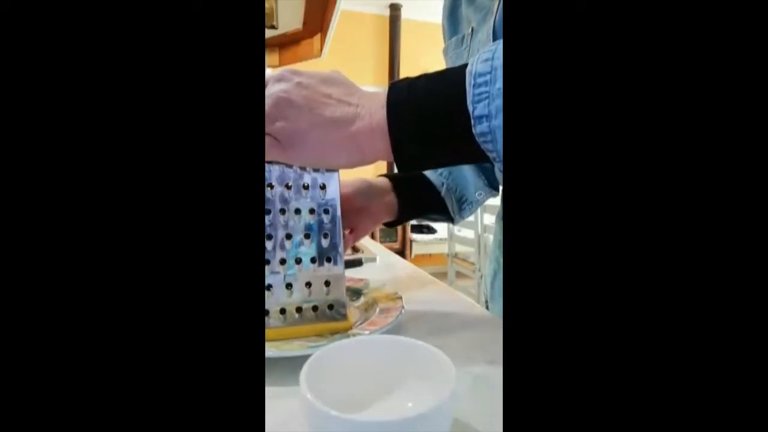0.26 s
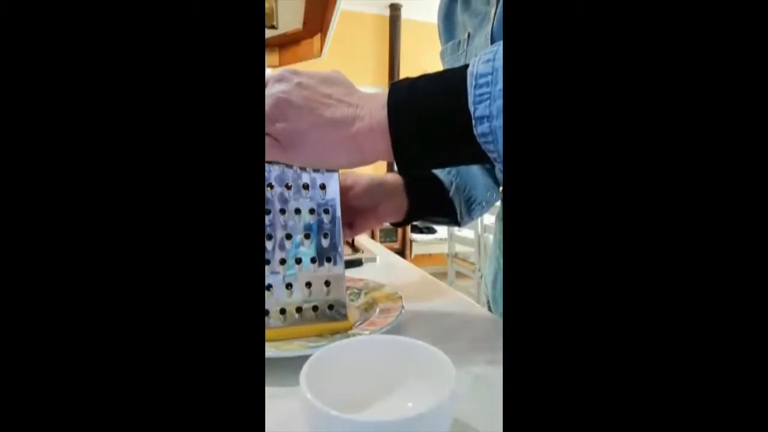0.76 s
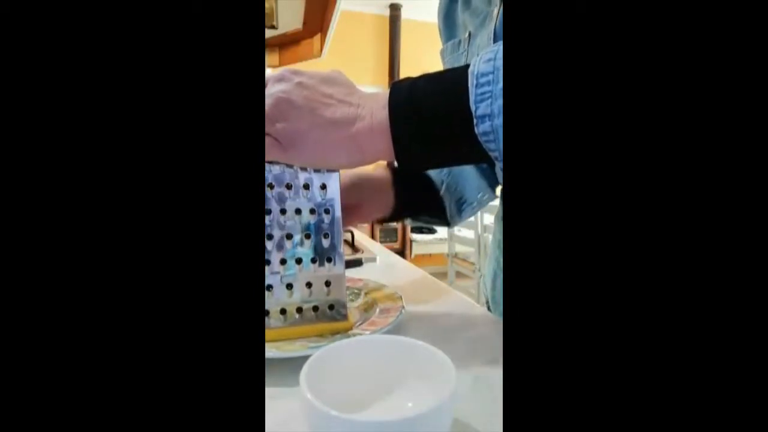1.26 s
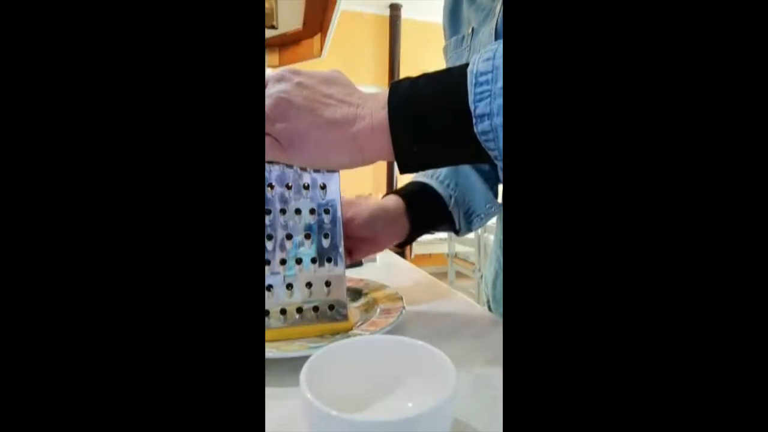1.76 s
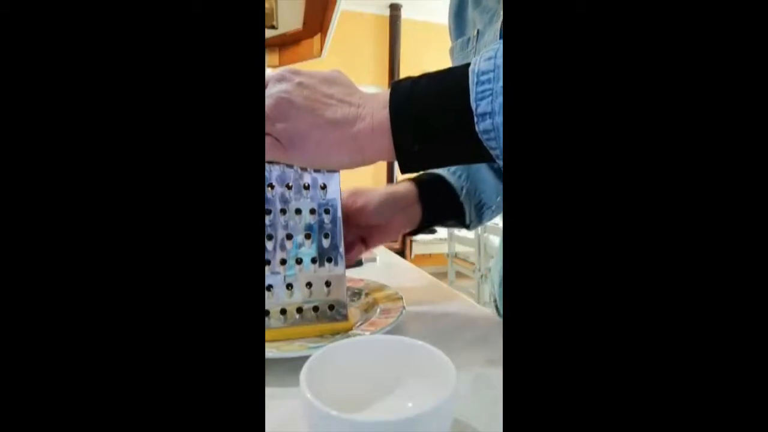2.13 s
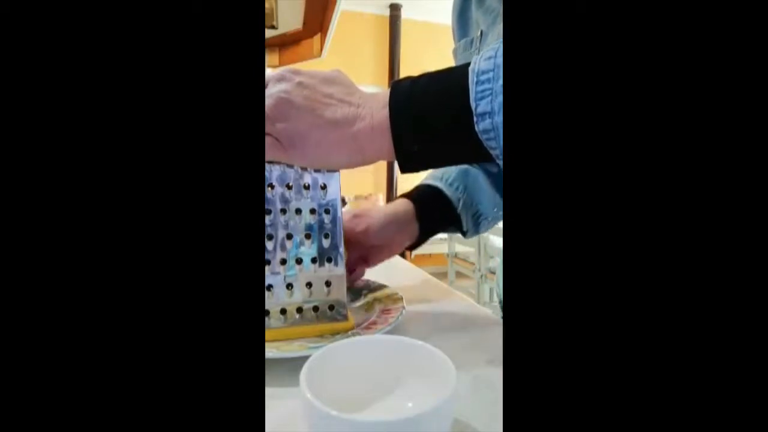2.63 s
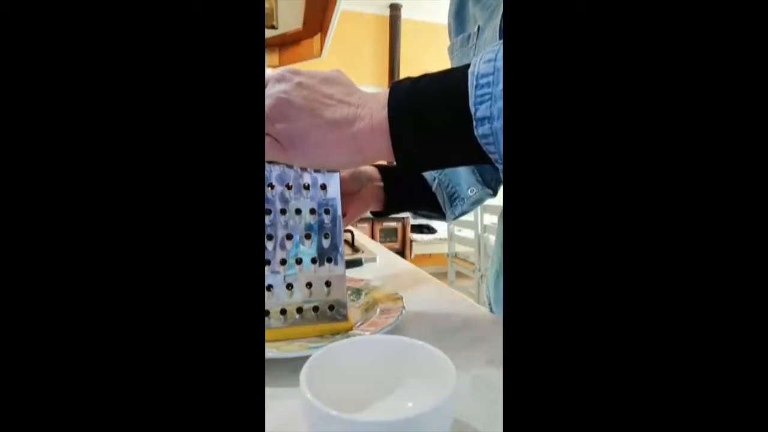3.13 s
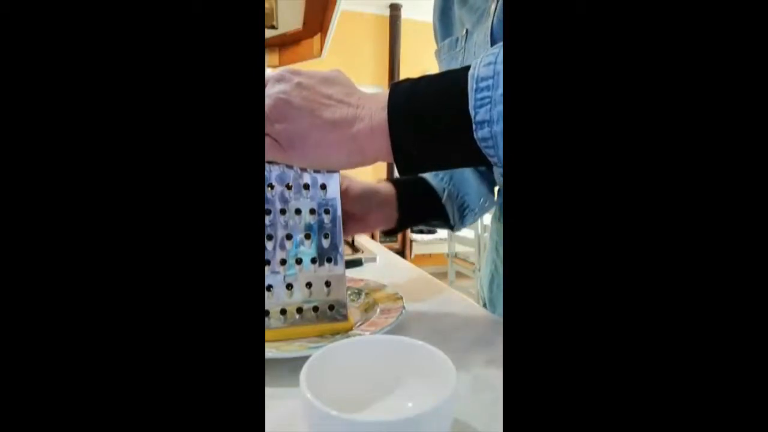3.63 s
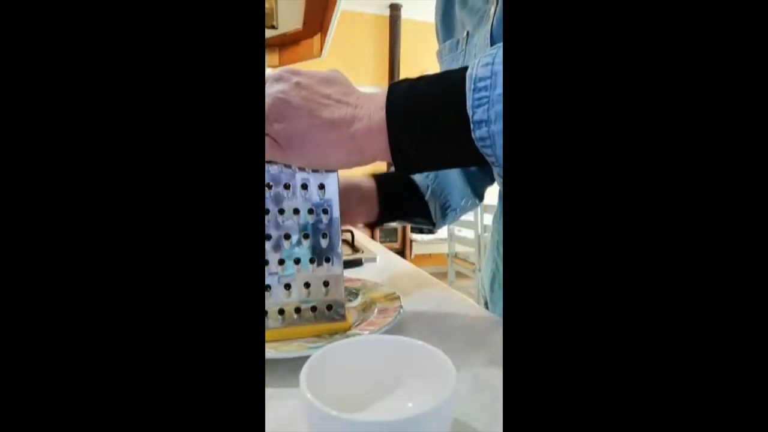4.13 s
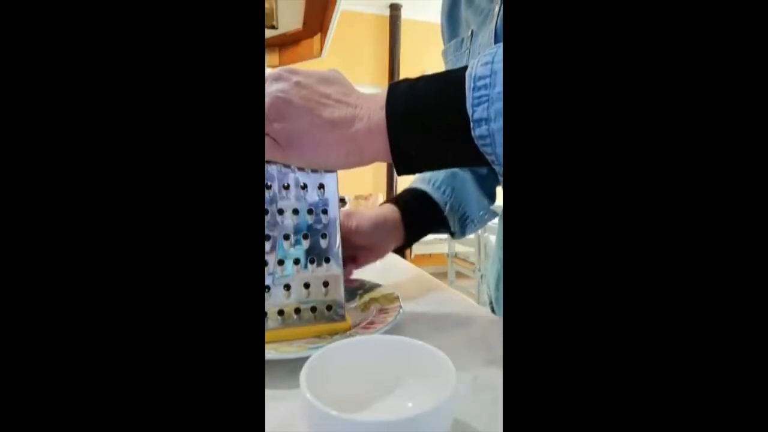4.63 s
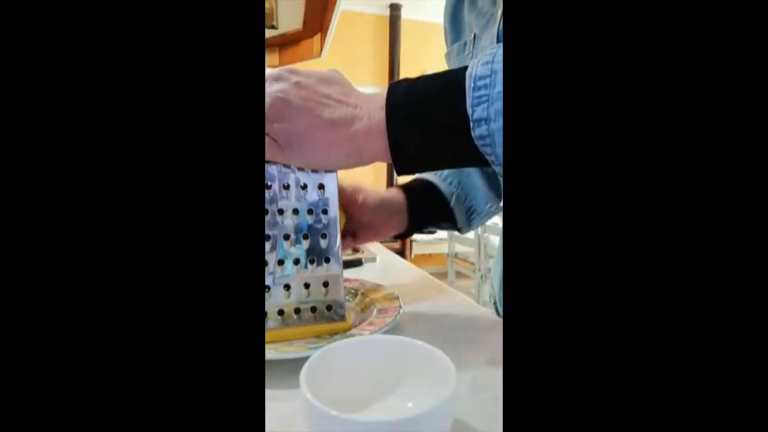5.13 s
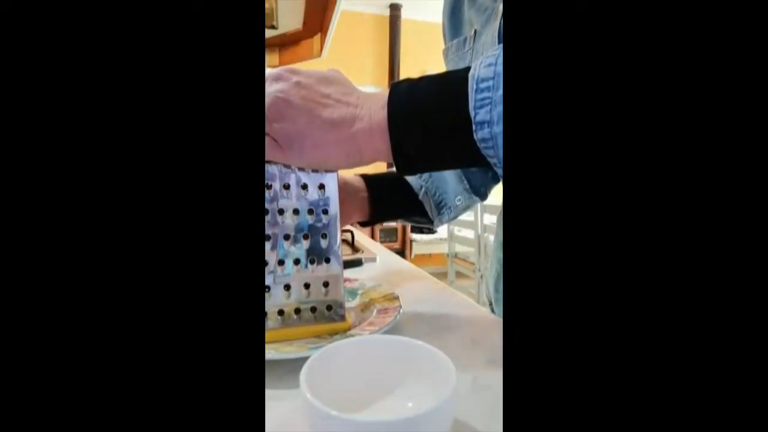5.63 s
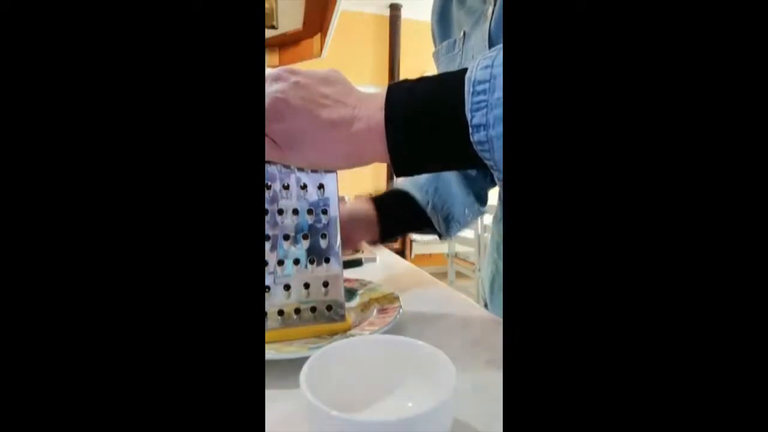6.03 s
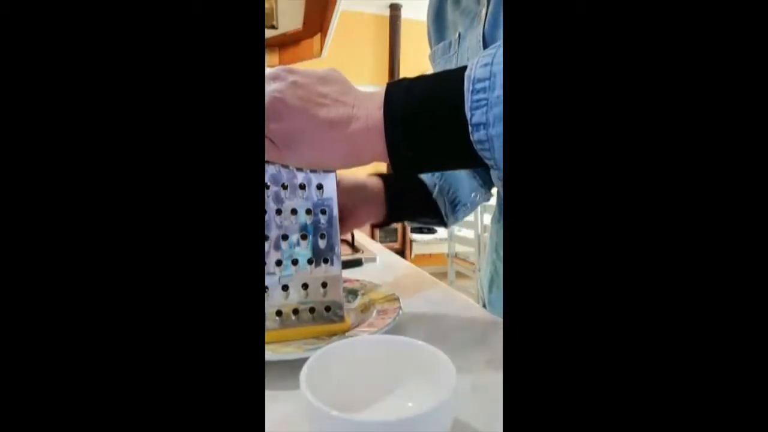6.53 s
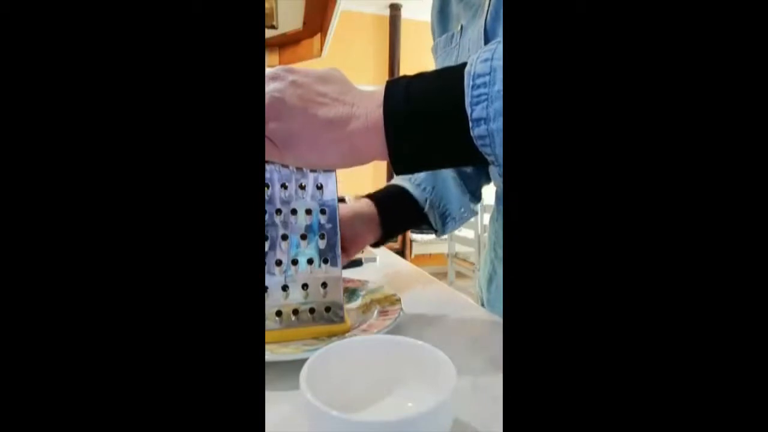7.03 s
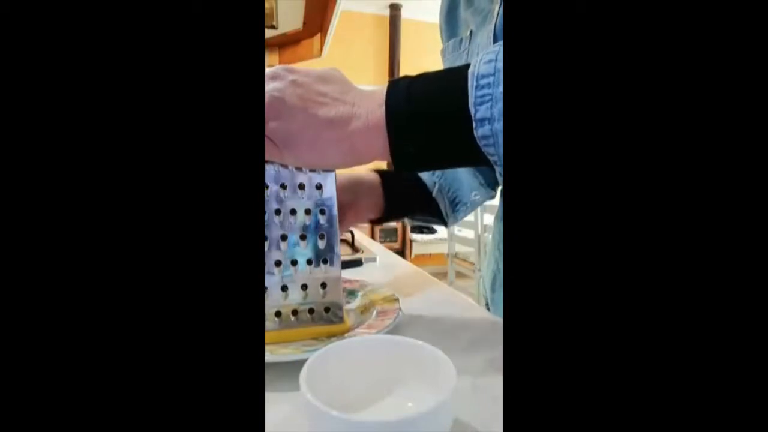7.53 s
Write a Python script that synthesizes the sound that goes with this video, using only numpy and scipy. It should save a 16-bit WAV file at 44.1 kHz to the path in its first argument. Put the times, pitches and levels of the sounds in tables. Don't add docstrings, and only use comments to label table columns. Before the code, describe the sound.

Fast, gritty scraping strokes on a ringing steel grater stop and restart twice, with light taps between them and a small final scrape on the plate.

```python
import sys
import numpy as np
from scipy import signal
from scipy.fft import rfft, irfft, next_fast_len
from scipy.io import wavfile
from scipy.ndimage import uniform_filter1d, map_coordinates

SR = 44100
rng = np.random.default_rng(int(sys.argv[2]) if len(sys.argv) > 2 else 0)


def magnitude_from_level(level_db):
    exponent = np.asarray(level_db, float) / 20
    return 10 ** exponent


def generate_wav(signal):
    frames = np.transpose(np.atleast_2d(signal))
    scaled = np.clip(frames, -1, 1) * 32767
    pcm = np.round(scaled).astype(np.int16)
    wavfile.write(sys.argv[1], SR, pcm)


N = 342657

# start_s, length_s, rasp_db, lean_db, ring_db
FIRST_STROKES = [(-0.013, 0.033, -29.5, -44, -13), (0.514, 0.11, -31.5, -4, -3.5),
                 (0.643, 0.12, -33.5, 10.5, -2.5), (0.8, 0.11, -31.5, 2.5, 2.1),
                 (0.928, 0.11, -30.5, -2, 0.6), (1.071, 0.093, -35.5, 26, -2.5),
                 (1.227, 0.098, -30.5, -7.5, -2), (1.358, 0.1, -27.5, 4, -3.5),
                 (1.502, 0.11, -33, -8.5, -2.5), (1.631, 0.033, -48, -42, -32),
                 (1.695, 0.12, -34.5, 9, -7.5), (1.845, 0.1, -31.5, 0, -2), (1.987, 0.11, -32.5, 8.5, -16),
                 (2.16, 0.098, -32, -1, -2), (2.28, 0.11, -28.5, 6, -1), (2.42, 0.11, -29, 1, -1.5),
                 (2.56, 0.11, -26, -4.5, -0.5), (2.709, 0.068, -41.5, 0, 2), (2.78, 0.082, -43.5, -5, 6)]
SECOND_STROKES = [(3.365, 0.1, -29, 6, 2), (3.504, 0.12, -33.5, 5.5, 0), (3.664, 0.13, -30, -4, -2.5),
                  (3.813, 0.11, -30.5, -8, 1), (3.954, 0.11, -34, -8, -4.5), (4.104, 0.11, -33.5, -5.5, 1),
                  (4.235, 0.11, -27, 11, 0), (4.403, 0.13, -31.5, -10, 3.5), (4.524, 0.13, -26, 0, -4),
                  (4.695, 0.11, -29.5, -2.5, -2), (4.83, 0.11, -28, 1.5, -6.5),
                  (4.981, 0.098, -30.5, -8, -1.5), (5.117, 0.12, -27, 1.5, -7.5)]
THIRD_STROKES = [
    (5.974, 0.11, -31, 7, 4.5),
    (6.106, 0.13, -31.5, 4, 0),
    (6.273, 0.12, -32, 2, -1.1),
    (6.424, 0.1, -29.5, 3.5, 1.5),
    (6.572, 0.097, -31.5, 2.5, 4),
    (6.695, 0.12, -28.5, 4.5, 3.5),
    (6.99, 0.097, -34.5, -30.5, -7),
    (7.143, 0.09, -31, 2, 2),
    (7.27, 0.11, -29, 5.5, -2.5),
    (7.431, 0.1, -43, -10.5, 0),
]


def unit(x):
    return x / np.sqrt(np.mean(x ** 2) + 1e-20)


def along(points, hz):
    f, v = np.transpose(points)
    return np.interp(np.log(hz + 1), np.log(f + 1), v)


def wobble(rate):
    return map_coordinates(rng.standard_normal(N // 100), [np.arange(N) * min(rate, 400) / SR])


def filtered(x, response):
    m = next_fast_len(N + SR // 2)
    return irfft(rfft(x, m) * response(np.fft.rfftfreq(m, 1 / SR)), m)[..., :N]


def modes(table):
    def response(f):
        total = 0
        for k, (centre, width, db) in enumerate(table):
            damping = 1j * f * width
            total = total + (-1) ** k * magnitude_from_level(db) * 1j * f * width / (centre * centre - f * f + damping)
        return total
    return response


def ports(pair, alike, sideways, lead):
    def blend(hz):
        angle = np.arccos(np.clip(along(alike, hz), -1, 1)) / 2
        return np.array([np.cos(angle), np.sin(angle)])

    def aim(hz):
        half = np.array([[.5], [-.5]])
        return magnitude_from_level(half * along(sideways, hz)) * np.exp(1j * half * np.interp(hz, *np.transpose(lead)))

    mid, side = filtered(pair, blend)
    return filtered(np.array([mid + side, mid - side]), aim)


def echoes(x, decay, size, step):
    hz, t, _ = signal.stft(np.zeros(size), SR, nperseg=256)
    fade = magnitude_from_level(-60 * t / along(decay, hz)[:, None])
    out = np.zeros((2, x.shape[1] + 2 * SR))
    for at in range(0, x.shape[1], step):
        noise = signal.stft(rng.standard_normal((2, size)), SR, nperseg=256)[2]
        tail = signal.istft(noise * fade, SR, nperseg=256)[1]
        wet = signal.fftconvolve(x[:, at:at + step], tail / np.linalg.norm(tail[0]), axes=1)
        out[:, at:][:, :wet.shape[1]] += wet
    return out[:, :x.shape[1]]


def snags(rate, spread_db):
    caught = rng.random((2, N)) < rate / SR
    return unit(caught * rng.standard_normal((2, N)) * magnitude_from_level(spread_db * rng.exponential(size=N)))


def strokes():
    usual_db = -31
    sheet_db, heavy_db = 4.5, np.array([-1, -8.5, -10.5])
    heavy_grows = np.array([0.78, 0.47, 0.65])
    box_shares = 0.26
    gains = np.zeros((6, N))
    t = np.arange(N) / SR
    for start, length, db, lean_db, ring_db in [*FIRST_STROKES, *SECOND_STROKES, *THIRD_STROKES]:
        on = slice(max(round(start * SR), 0), round((start + length) * SR))
        u = np.clip((t[on] - start) / length, 0, 1)
        speed = np.abs(np.sin(np.pi * u)) ** np.where(u < .5, 1.0, 0.93)
        bite = np.tanh(1.185 * speed)
        bite = bite * magnitude_from_level(1.07 + db + lean_db * (u - .5))
        box_db, plate_db, boom_db = heavy_db + (heavy_grows - 1) * (db - usual_db)
        body_db = np.c_[0, sheet_db, box_db + box_shares * ring_db, ring_db, plate_db, boom_db]
        gains[:, on] += bite * magnitude_from_level(body_db.T)
    return gains


def touches():
    # start_s, peak_db, brightness_db
    contacts = [
        (0.202, -49.5, 7),
        (3.048, -39, 1),
        (3.062, -41.5, 4.5),
        (5.476, -35.5, -16),
        (5.497, -53, -13),
        (5.519, -62, -5),
        (5.569, -66, 0.5),
        (5.649, -58, -2),
        (5.815, -48.5, 11),
        (5.864, -53, -13),
    ]
    t = np.arange(SR // 5) / SR
    gains = np.zeros((6, N + SR))
    for s, db, bright_db in contacts:
        brush = magnitude_from_level(db - 6 - 60 * t / 0.033) * (1 - np.exp(-t / 0.003))
        body_db = np.c_[bright_db - 3, bright_db - 3, 0, -3, 3, 3]
        gains[:, round(s * SR):][:, :len(t)] += brush * magnitude_from_level(body_db.T)
    return gains[:, :N]


def bites():
    # time_s, rasp_change_db, box_change_db
    catches = [(0.556, 0.5, 1), (0.691, -9, -5), (0.706, 4.5, 7.5), (0.725, -10, -6), (0.942, 2.5, 5.5),
               (1.097, 6.5, 6.5), (1.161, 7.5, -6), (1.88, 4, 3), (1.918, 5, -6), (1.94, 6, -19),
               (1.54, 2.5, 4), (2.327, 6.5, 1.5), (2.461, 3, 0), (2.86, 7, -32), (3.735, 3, 4.5),
               (3.896, 5, -1.5), (3.982, -7, -4), (3.992, 7, 1), (4.197, -2, -24), (4.509, 3.5, -13),
               (4.564, -8, -3), (5.992, -3.2, -12), (6.041, 3.5, 4), (6.796, 5, 3), (6.349, 6, 5),
               (6.706, -21, -10), (6.719, 1.5, 6), (7.027, -3.5, 6.5), (7.044, 6, 8.5), (7.508, -10, -13)]
    change = np.zeros((2, N))
    t = np.arange(-SR // 40, SR // 40) / SR
    bump = np.exp(-.5 * (t / 0.0057) ** 2)
    for s, *db in catches:
        change[:, round(s * SR) - SR // 40:][:, :len(t)] += np.outer(db, bump)
    return change


def jolts():
    # start_s, plate_db, worktop_db
    leans = [
        (0.68, -50, -30),
        (1.37, -35, -33),
        (1.7, -38, -23.5),
        (3.365, -31.5, -29),
        (3.67, -37, -37),
        (3.97, -34.5, -59),
        (4.7, -31, -47),
        (5.474, -68, -55),
        (6.14, -59, -47),
        (6.579, -39, -36),
    ]
    rise_s, t60_s = 0.0079, 0.24
    t = np.arange(SR // 5) / SR
    push = magnitude_from_level(-60 * t / t60_s) * (1 - np.exp(-t / rise_s))
    gains = np.zeros((2, N + SR))
    for s, *db in leans:
        gains[:, round(s * SR):][:, :len(t)] += np.outer(magnitude_from_level(db), push)
    return gains[:, :N]


def slide():
    # time_s, level_db
    scrape = [
        (7.53, -56),
        (7.55, -59),
        (7.568, -47),
        (7.594, -46),
        (7.654, -60),
        (7.7, -95),
    ]
    return magnitude_from_level(np.interp(np.arange(N) / SR, *np.transpose(scrape), left=-120, right=-120))


def driven(gain, blows, body, db):
    loudness = np.sqrt(np.mean(np.abs(body(np.arange(SR // 2))) ** 2))
    return filtered(gain * blows, body) * magnitude_from_level(db) / loudness


def grater():
    # pitch_hz, level_db
    peel = [(880, -6.5), (1650, -12), (2080, -5), (2840, -5), (3640, -2), (6760, -3), (8990, -5.5),
            (15800, -26.5)]
    # pitch_hz, width_hz, level_db
    face = [(2545, 70, -3), (3050, 70, -5), (3300, 200, -4), (3810, 110, -7), (4200, 150, -8),
            (4590, 100, -5), (6580, 450, -8), (7150, 250, -9), (8540, 160, -9), (9200, 140, -8)]
    hollow = [(534, 22.5, -3.5), (778.3, 32, -6.5), (948, 33, -1.5), (1168, 165, -9.5), (1345, 59, -1),
              (1534, 38, -9), (1718, 95, -4), (1839, 36, -9)]
    broad_side = [(972, 80, -3.5), (1056, 59, 5)]
    plate_modes = [(212, 35, -9), (268, 55, -1.5), (336, 40, 0), (430, 90, -6)]
    worktop = [(72, 25, -15), (101, 22, -8), (121, 18, 0)]
    rim = [(520, 60, -8), (764, 30, -6), (1010, 90, 0), (1450, 110, -7), (3400, 90, -8), (4820, 70, -14),
           (6500, 5000, -29)]
    # pitch_hz, t60_s
    shimmer = [(300, 0.02), (1500, 0.031), (5000, 0.056), (12000, 0.075)]

    gains = strokes() + touches()
    gains[4:] += jolts()
    rasp, sheet, box, ring, plate, boom = gains
    rasp_db, box_db = bites()
    judder = wobble(70)
    place_db = 2.5 * wobble(9)
    fine, coarse, heavy = snags(9000, spread_db=1.5), snags(4000, spread_db=1.5), snags(1500, spread_db=0.5)

    def tearing(hz):
        return magnitude_from_level(along(peel, hz))

    def deep_shake(hz):
        return modes(worktop)(hz) / (1 + 1j * (hz / 140) ** 4)

    out = driven(rasp * magnitude_from_level(rasp_db + 0.58 * judder + 0.34 * wobble(250)), fine, tearing, -1.1)
    out += driven(sheet * magnitude_from_level(rasp_db + 0.3 * judder + place_db), coarse, modes(face[::2]), -11)
    out += driven(sheet * magnitude_from_level(rasp_db + 0.42 * judder - place_db), coarse, modes(face[1::2]), -16)
    unsteady_db = 1.2 * judder + 1.1 * wobble(120)
    out += driven(box * magnitude_from_level(box_db + unsteady_db + place_db), coarse, modes(hollow[::2]), -7.5)
    unsteady_db = 1.0 * judder + 0.21 * wobble(130)
    out += driven(box * magnitude_from_level(box_db + unsteady_db - place_db), heavy, modes(hollow[1::2]), -6)
    unsteady_db = 0.33 * judder + 0.97 * wobble(60)
    out += driven(ring * magnitude_from_level(2.17 * box_db + unsteady_db), fine, modes(broad_side), -4)
    out += driven(plate * magnitude_from_level(0.53 * box_db + 0.35 * wobble(33)), heavy, modes(plate_modes), -.4)
    out += driven(boom * magnitude_from_level(0.94 * wobble(30)), coarse, deep_shake, -5.5)
    out += driven(slide() * magnitude_from_level(1.7 * judder), coarse, modes(rim), .4)
    return out + magnitude_from_level(-4.5) * echoes(out, shimmer, size=SR // 12, step=SR // 7)


def kitchen(near):
    # pitch_hz, t60_s
    decay = [(100, 0.79), (300, 0.38), (700, 0.43), (2000, 0.33), (6000, 0.33), (12000, 0.19)]
    earlier = magnitude_from_level(-4.0) * near[:, SR // 2:SR * 3 // 5]
    wet = echoes(np.hstack([earlier, near]), decay, size=SR * 3 // 5, step=SR // 4)
    return wet[:, earlier.shape[1] - SR // 200:][:, :N]


def room_tone():
    # pitch_hz, level_db
    hush_color = [(130, -7.5), (560, -13.5), (1140, -7), (1800, -8.5), (2300, -14.5), (9310, -10.5),
                  (11500, -21.5), (15800, -26)]
    hum_color = [(12, -41), (20, -2), (40, -12), (85, 1.5), (110, -8.5), (180, -24.5), (260, -56),
                 (440, -120)]
    # pitch_hz, likeness
    hush_alike = [(60, 0.98), (180, 0.96), (550, -0.28), (1650, 0.19), (4970, -0.067), (15000, 0.08)]
    # pitch_hz, level_db
    hush_sideways = [(60, -3), (180, 4), (550, -1), (1650, -5), (4970, 0), (15000, -13.5)]
    arm_db, arm_s = 8, 0.067
    t = np.arange(N) / SR
    working = np.zeros(N)
    for run, first in ((FIRST_STROKES, 1), (SECOND_STROKES, 0), (THIRD_STROKES, 0)):
        working += (t > run[first][0]) & (t < run[-1][0] + run[-1][1])
    swell_db = 5.5 * np.exp(-((t - 0.2) / 0.35) ** 2)
    hum_db = -65.5 + arm_db * uniform_filter1d(working, round(arm_s * SR)) + swell_db
    hush_db = -61.5 + 16 * np.exp(-t / 0.11)
    hush = unit(filtered(rng.standard_normal((2, N)), lambda hz: magnitude_from_level(along(hush_color, hz))))
    hum = unit(filtered(rng.standard_normal((2, N)), lambda hz: magnitude_from_level(along(hum_color, hz))))
    both = magnitude_from_level(hush_db + 1.8 * wobble(15)) * hush + magnitude_from_level(hum_db + 1.3 * wobble(4.44)) * hum
    return ports(both, hush_alike, hush_sideways, [(0, 0)])


def scene():
    # pitch_hz, level_db
    spread = [(100, 5), (400, 1.5), (1050, -4), (2000, 2), (5000, -2), (12000, 3)]
    # pitch_hz, likeness
    alike = [(60, .95), (130, .9), (300, .82), (600, .75), (1200, .8), (2400, .45), (5000, .22),
             (14000, .15)]
    # pitch_hz, level_db
    sideways = [(60, 1), (200, -1), (380, -2), (700, -9), (1290, -5), (2380, 0), (8120, -3), (15000, -16.5)]
    # pitch_hz, lead_radians
    lead = [(0, 0), (520, -1), (800, -.1), (1400, .2), (2500, 1.1), (4200, 2.5), (16000, 9.1)]
    near = grater()
    far = kitchen(filtered(near, lambda hz: magnitude_from_level(along(spread, hz) - 13.0)))
    close = filtered(near + far, lambda hz: 1 / (1 + (47.4 / (hz + 1)) ** 4))
    return ports(close, alike, sideways, lead) + room_tone()


def low_pass(x):
    return signal.sosfilt(signal.butter(12, 15900, fs=SR, output="sos"), x)


def record(dry):
    mix = filtered(dry, lambda hz: hz < 15880)
    return low_pass(mix)


dry = scene()
out = record(dry)
generate_wav(out)
```